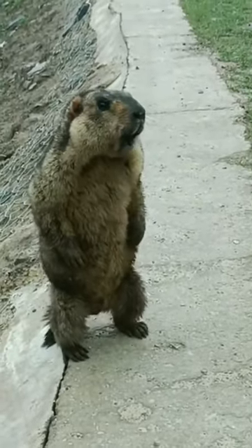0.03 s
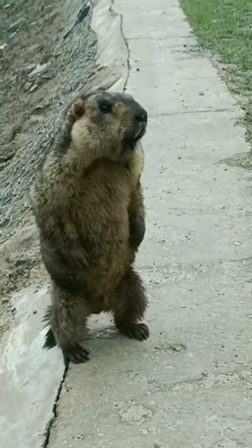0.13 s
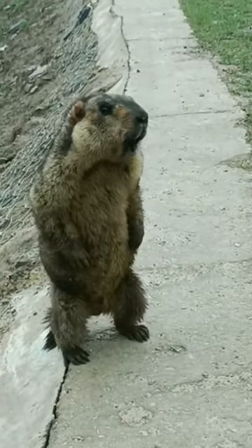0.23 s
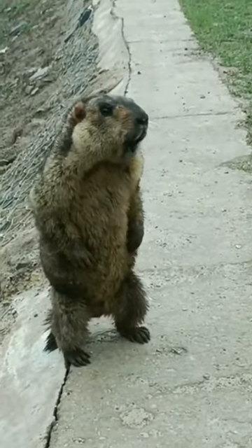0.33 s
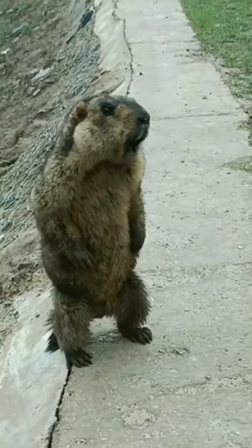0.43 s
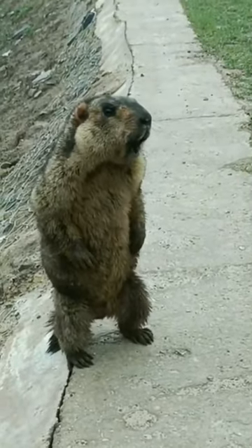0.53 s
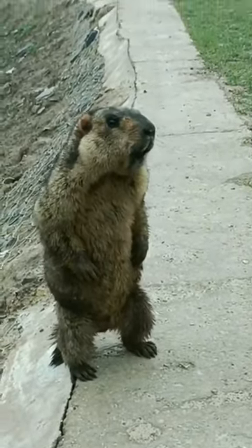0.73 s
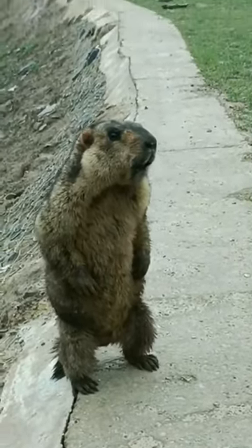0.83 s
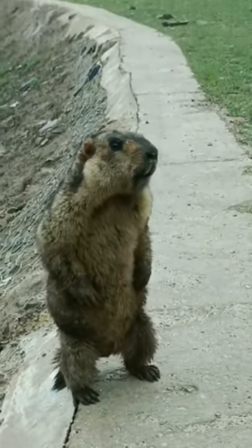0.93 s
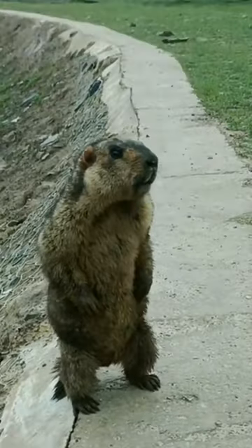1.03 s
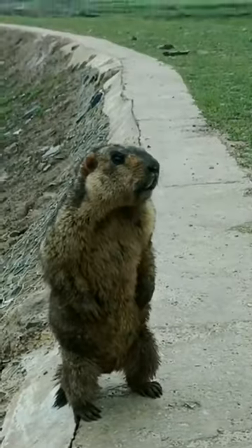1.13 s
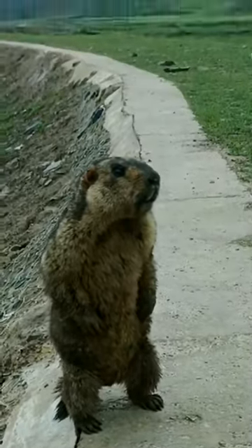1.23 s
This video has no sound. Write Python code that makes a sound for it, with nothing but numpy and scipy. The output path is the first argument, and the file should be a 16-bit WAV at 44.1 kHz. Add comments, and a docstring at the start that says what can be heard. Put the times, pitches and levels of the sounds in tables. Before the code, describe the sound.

Quick, piercing marmot whistles come as a close pair, then two more, with breath puffs and tiny falling squeaks after the later three; steady wind remains, then two small scuffs, in a handheld outdoor recording.

```python
"""Steady wind in the grass throughout (coloured noise), with soft low bumps of a hand shifting on a camera.
Over it a marmot on a concrete path, close by, gives four sharp alarm calls. Puffs of mouth air and low grunts
open them; a rough voice (jittered partials plus resonant noise) sweeps up into a clean whistle and stops.
A faint falling squeak follows each call but the first. Ground colours the voice differently at two
microphone ports; path and slope echo it (decaying noise tails). Two small scuffs come late."""
import sys
import numpy as np
from scipy import signal
from scipy.fft import rfft, irfft, next_fast_len
from scipy.io import wavfile
from scipy.ndimage import uniform_filter1d, minimum_filter1d, map_coordinates

SR = 44100
rng = np.random.default_rng(int(sys.argv[2]) if len(sys.argv) > 2 else 0)


def bounce(signal):
    """Save signal as a 16-bit WAV file at the path given by the first command-line argument."""
    frames = np.transpose(np.atleast_2d(signal))
    limited = np.clip(frames, -1, 1)
    pcm = np.round(limited * 32767).astype(np.int16)
    wavfile.write(sys.argv[1], SR, pcm)


N = 57330


def amp(db):
    """Decibels to gain."""
    return 10 ** (np.asarray(db) / 20)


def unit(x):
    """Scale to rms 1."""
    return x / np.sqrt(np.mean(x ** 2) + 1e-20)


def along(points, hz):
    """Interpolate (Hz, value) points on a log-frequency axis."""
    f, v = np.transpose(sorted(map(tuple, points)))
    return np.interp(np.log(hz + 1), np.log(f + 1), v)


def since(s):
    """Seconds since s, for every sample."""
    return np.arange(N) / SR - s


def wobble(knots_per_s):
    """Smooth random curve: a spline through normal draws."""
    return map_coordinates(rng.standard_normal(N), [np.arange(N) * knots_per_s / SR + 4])


def filtered(x, response):
    """Apply a complex response of frequency, zero-padded."""
    m = next_fast_len(N + SR // 2)
    return irfft(rfft(x, m) * response(np.fft.rfftfreq(m, 1 / SR)), m)[..., :N]


def noise(spectrum, resonances=()):
    """Coloured noise of rms 1, lifted in dB at each resonance."""
    def response(hz):
        lift_db = sum(db / (1 + ((hz - centre) / width) ** 2) for centre, width, db in resonances)
        return amp(along(spectrum, hz) + lift_db)
    return unit(filtered(rng.standard_normal(N), response))


BURST_RISE_S = 0.00097


def bursts(rows):
    """Envelope of short bursts: quick exponential rise, slower exponential decay."""
    return sum(amp(db) * np.exp(np.minimum(since(s) / BURST_RISE_S, -since(s) / decay_s))
               for s, db, decay_s in rows)


# wind level before WIND_GAIN_DB: (time [s], level [dB])
WIND_LEVEL = [(0, -43.5), (0.122, -42), (.25, -47), (.45, -46), (.59, -46), (.645, -41), (.70, -46.5),
              (.82, -46), (.93, -42.5), (1.091, -42.5), (1.3, -42)]
# wind spectrum, relative: (frequency [Hz], level [dB])
GRASS_SPECTRUM = [(35, -29), (60, -15.5), (123, -13.5), (383, -1), (511, -3.5), (755, -2), (890, -5),
                  (1120, -3), (1520, -6), (2300, -7), (3610, -16.5), (5020, -21), (5450, -24),
                  (8230, -33.5), (10700, -71), (18100, -120)]
# left-right correlation of the wind: (frequency [Hz], correlation [-1..1])
WIND_CORRELATION = [(60, 0.031), (160, 1), (420, 0.862), (1110, 0.275), (2940, -0.128), (7780, 0.09)]
WIND_GAIN_DB, FLUTTER_DB = 3, .9


def wind():
    """Grass rush: mid and side noises mixed to a set left-right correlation, with slight flutter."""
    # correlation = cos^2 - sin^2 = cos(2 * turn)
    turn = lambda hz: np.arccos(np.clip(along(WIND_CORRELATION, hz), -1, 1)) / 2
    mid = filtered(noise(GRASS_SPECTRUM), lambda hz: np.cos(turn(hz)))
    side = filtered(noise(GRASS_SPECTRUM), lambda hz: np.sin(turn(hz)))
    slow_db = np.interp(since(0), *np.transpose(WIND_LEVEL))
    level_db = slow_db + WIND_GAIN_DB + FLUTTER_DB * wobble(43)
    return amp(level_db) * np.array([mid + side, mid - side])


# hand shifts on the camera: (time [s], length [s], level [dB])
HAND_BUMPS = [(0.2, .014, -44.5), (0.263, .018, -47.5), (0.351, .02, -51.5), (0.547, .012, -56.5),
              (0.583, .018, -53.5), (0.915, .06, -46.5), (1.032, 0.0536, -52)]
# bump spectrum, relative: (frequency [Hz], level [dB])
BUMP_SPECTRUM = [(20, -10), (60, -1.5), (120, -12), (300, -49), (1000, -73)]
# small scuffs: (time [s], level [dB], decay [s])
SCUFFS = [(1.076, -33.5, 0.0013), (1.087, -29, 0.0033)]
# scuff spectrum, relative: (frequency [Hz], level [dB])
SCUFF_SPECTRUM = [(300, -15), (1400, -10), (2300, 1.5), (3500, -43), (5000, -11.5), (9000, -35)]


def handling():
    """Gaussian swells of low noise and two short noise scuffs, independent at each port."""
    swell = sum(amp(db) * np.exp(-(since(s) / length_s) ** 2) for s, length_s, db in HAND_BUMPS)
    scuff = bursts(SCUFFS)
    return np.array([swell * noise(BUMP_SPECTRUM) + scuff * noise(SCUFF_SPECTRUM) for port in range(2)])


def echo(x, t60):
    """Scattered stereo tail: noise in which each frequency decays at its own t60."""
    hz, t, z = signal.stft(rng.standard_normal((2, SR // 3)), SR, nperseg=128)
    decay = amp(-60 * t / along(t60, hz)[:, None])
    tail = signal.istft(z * decay, SR, nperseg=128)[1]
    tail = tail / np.linalg.norm(tail[0])
    return signal.fftconvolve(x[None], tail, axes=1)[:, :N]


# slope decay: (frequency [Hz], t60 [s])
SLOPE_T60 = [(300, .12), (3300, 0.1853), (8000, 0.12)]
# colour of the voice sent to the slope: (frequency [Hz], gain [dB])
SLOPE_COLOUR = [(1000, -8), (2500, -9), (3400, 2), (4200, -6), (6700, 2.5), (9000, -18)]
SLOPE_DB = -22


def slope_echo(voice):
    """Weak coloured scatter from the slope."""
    sent = filtered(voice, lambda hz: amp(along(SLOPE_COLOUR, hz)))
    return amp(SLOPE_DB) * echo(sent, SLOPE_T60)


PATH_DB, PATH_T60_S = -19.5, 0.028


def path_echo(voice):
    """Short scatter from the path, one t60 for all frequencies."""
    return amp(PATH_DB) * echo(voice, [(1000, PATH_T60_S)])


# ground colour of the voice at the ports, before smoothing: (frequency [Hz], left [dB], right [dB])
PORT_COLOUR = [(680, -5, -5.5), (1010, -10, -16), (1077, -7, 4), (1297, -12.5, -16), (1360, 3.5, 2),
               (1481, -3, -8.5), (1953, -10, -6.5), (2182, 3.5, -7.5), (2427, -6.5, -7.5), (2837, -4, 0),
               (3259, -1.5, 5.5), (3407, -18, 3), (3377, -9, -1.5), (3975, 4, 2.5), (3980, -7, -5),
               (6910, 3.5, -1), (6990, 3.5, -30.5), (8000, -3.5, -15.5)]
# phase by which left leads right, before smoothing: (frequency [Hz], lead [rad])
LEFT_LEAD = [(1000, 1), (1350, -4), (1850, 1.4272), (2250, -3), (2550, -0.16), (2900, -2), (3700, -1.682),
             (4500, -0.8548), (7000, -1.6759)]
PORT_SMOOTH_HZ = 70


def ports(voice):
    """Direct voice: each port has its own gain and phase over frequency."""
    def response(hz):
        left_db = along([(f, left) for f, left, right in PORT_COLOUR], hz)
        right_db = along([(f, right) for f, left, right in PORT_COLOUR], hz)
        phase = .5 * np.outer([1, -1], along(LEFT_LEAD, hz))
        gain = amp(np.array([left_db, right_db])) * np.exp(1j * phase)
        size = round(PORT_SMOOTH_HZ / hz[1])
        return uniform_filter1d(uniform_filter1d(gain, size), size)
    return filtered(voice, response)


# puffs of air from the mouth: (time [s], level [dB], decay [s])
MOUTH_PUFFS = [(.2045, -19, 0.00794), (.2995, -25.5, 0.009), (.318, -36.5, 0.0027), (.530, -29, 0.024),
               (.689, -27.5, 0.021)]
# breath spectrum, relative, also in the squeaks: (frequency [Hz], level [dB])
BREATH_SPECTRUM = [(200, -6.5), (800, -6), (1300, 2.5), (2300, -4), (3700, -0.5), (4300, -15), (6400, -22),
                   (7300, -25.5), (9000, -25)]
# throat resonances, also of the rasp: (centre [Hz], half-width [Hz], lift [dB])
THROAT_RESONANCES = [(3704, 140, 6.5), (4750, 110, 12), (5600, 94, 8.5), (6400, 250, 12.5), (7980, 180, 12)]


def puffs():
    """Bursts of breath noise through the throat resonances."""
    return bursts(MOUTH_PUFFS) * noise(BREATH_SPECTRUM, THROAT_RESONANCES)


# faint squeaks after calls: (time [s], mid pitch [Hz], level [dB])
SQUEAK_TABLE = [(.405, 1651, -25.5), (0.626, 1647, -26.5), (.770, 1757, -21.5)]
SQUEAK_S, SQUEAK_FALL_HZ_PER_S, SQUEAK_OCTAVE_DB, SQUEAK_JITTER = 0.0036, 15000, -5.5, .035


def squeak(s, mid_hz, db):
    """Brief falling note, pitch-jittered, with its octave and a little breath."""
    t = since(s)
    hz = (mid_hz - SQUEAK_FALL_HZ_PER_S * t) * (1 + SQUEAK_JITTER * wobble(900))
    phase = 2 * np.pi * np.cumsum(hz) / SR
    octave = amp(SQUEAK_OCTAVE_DB) * np.sin(2 * phase)
    breath = 0.065 * noise(BREATH_SPECTRUM)
    return amp(db) * np.exp(-(t / SQUEAK_S) ** 2) * (np.sin(phase) + octave + breath)


# grunt partials: (multiple of the pitch, level [dB])
GRUNT_PARTIALS = [(1, 0), (2, -4), (3, 7), (4, 0.5), (5, 6)]
GRUNT_HZ, GRUNT_LEAD_S, GRUNT_S, GRUNT_JITTER = 272, 0.01638, 0.01088, 0.049


def grunt(s, db):
    """A few cycles of a low, harmonic-rich note around the start of the sweep."""
    phase = 2 * np.pi * np.cumsum(GRUNT_HZ * (1 + GRUNT_JITTER * wobble(270))) / SR
    stack = sum(amp(level_db) * np.sin(round(k) * phase + rng.uniform(0, 2 * np.pi))
                for k, level_db in GRUNT_PARTIALS)
    return amp(db) * np.exp(-(since(s - GRUNT_LEAD_S) / GRUNT_S) ** 2) * stack


# alarm calls: (mid-sweep time [s], low pitch [Hz], top pitch [Hz], level [dB], swell before mid [s],
# swell depth [dB], hold after mid [s], rasp [dB], opening pitch offset [Hz], grunt [dB])
CALLS = [(0.2431, 1088, 3509, -9.5, .030, 20.5, 0.0331, -11, -400, -28.5),
         (0.3433, 1411, 3404, -9.5, .028, 5, 0.03413, -14, 259, -66.5),
         (0.5697, 1084, 3376, -9, 0.034, 35.5, 0.02561, -14.5, -450, -31.5),
         (0.7204, 1090, 3311, -9, .030, 24.5, 0.0214, -13.5, -480, -35.5)]
# rasp spectrum, relative: (frequency [Hz], level [dB])
RASP_SPECTRUM = [(150, -20), (260, -20.5), (420, -34.5), (800, -24), (1200, -7), (2200, 3.5), (3600, -0.5),
                 (4300, -5), (6400, -10), (7300, -18.5), (9000, -13.5)]
SWEEP_S, SWEEP_LEAD_S, OPENING_SHAPE = 0.015, .012, 3.268
SWELL_SHAPE, ATTACK_S, RELEASE_S = 1.203, 0.0036, 0.00188
SAG_HZ, SAG_S = 49.7, 0.0035  # pitch drop reached at the end of the hold, and its time constant
BREAK_S, BREAK_HZ, BREAK_FADE_S, BREAK_RISE_S = .2697, 330, .03, .0006  # upward crack in the first whistle
JITTER, SHIMMER_DB, CLEAR = 0.028, 3.5, 0.34  # CLEAR: share of roughness left in the whistle
RASP_TOP_DB = -7.5  # rasp at full tension, relative to the low voice
OCTAVE_LOW_DB, OCTAVE_TOP_DB, THIRD_DB, FOURTH_DB = -9.5, -19, -26, -26.5
OVERTONE_SCATTER_RAD = .5


def call(s, low_hz, top_hz, db, swell_s, depth_db, hold_s, rasp_db, opening_hz, grunt_db):
    """Pitch climbs an S-curve; rising tension cuts roughness, overtones and rasp."""
    t = since(s)
    tension = 1 - np.exp(-(np.maximum(t + SWEEP_LEAD_S, 0) / SWEEP_S) ** 2)
    early = np.clip(-t / swell_s, 0, 1)  # 1 at onset, 0 at mid-sweep

    hz = low_hz + (top_hz - low_hz) * tension + opening_hz * early ** OPENING_SHAPE
    hz = hz - SAG_HZ * np.exp(np.minimum((t - hold_s) / SAG_S, 1))
    has_crack = s < BREAK_S < s + hold_s
    cracked = has_crack * (.5 + .5 * np.tanh(since(BREAK_S) / BREAK_RISE_S))
    hz = hz + BREAK_HZ * cracked * np.exp(-abs(since(BREAK_S)) / BREAK_FADE_S)

    rough = 1 - (1 - CLEAR) * tension
    phase = 2 * np.pi * np.cumsum(hz * (1 + JITTER * rough * wobble(900))) / SR

    attack = np.clip((t + swell_s) / ATTACK_S, 0, 1)
    release = .5 - .5 * np.tanh((t - hold_s) / (2 * RELEASE_S))
    effort = attack * release * amp(db - depth_db * early ** SWELL_SHAPE)

    def partial(order):
        return np.sin(order * phase + OVERTONE_SCATTER_RAD * np.sqrt(tension) * wobble(800))

    # octave and rasp vanish after the crack
    octave_db = OCTAVE_LOW_DB + (OCTAVE_TOP_DB - OCTAVE_LOW_DB) * tension ** 2
    octave = amp(octave_db) * (1 - cracked) * partial(2)
    upper = (1 - tension) * (amp(THIRD_DB) * partial(3) + amp(FOURTH_DB) * partial(4))
    shimmer = amp(SHIMMER_DB * rough * wobble(700))
    tone = np.sqrt(2) * (np.sin(phase) + octave + upper) * shimmer
    rasp_level = amp(rasp_db + RASP_TOP_DB * tension ** 3) * (1 - cracked)
    rasp = rasp_level * noise(RASP_SPECTRUM, THROAT_RESONANCES)
    return effort * (tone + rasp) + grunt(s, grunt_db)


def scene():
    """Wind, handling, and the marmot's voice, direct and echoed."""
    calls = sum(call(*row) for row in CALLS)
    squeaks = sum(squeak(*row) for row in SQUEAK_TABLE)
    voice = calls + squeaks + puffs()
    return wind() + handling() + slope_echo(voice) + path_echo(voice) + ports(voice)


# recorder treble roll-off: (frequency [Hz], gain [dB])
TREBLE_ROLLOFF = [(7800, 1.5), (8600, -5.5), (9400, -8.5), (10000, -26)]
TOP_HZ = 10200
CEILING, LIMIT_S = .88, .003  # ceiling relative to full scale


def record(dry):
    """Camera: turn down any peaks above the ceiling, roll off treble, cut all from TOP_HZ up."""
    size = round(LIMIT_S * SR)
    needed = CEILING / np.maximum(abs(dry), CEILING)
    gain = uniform_filter1d(minimum_filter1d(needed, 2 * size), size)
    return filtered(dry * gain, lambda hz: amp(along(TREBLE_ROLLOFF, hz)) * (hz < TOP_HZ))


dry = scene()
out = record(dry)
bounce(out)
```